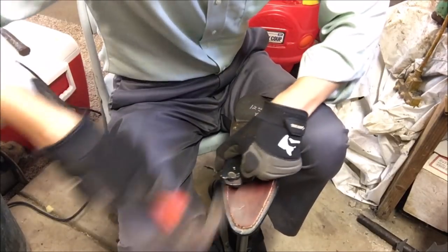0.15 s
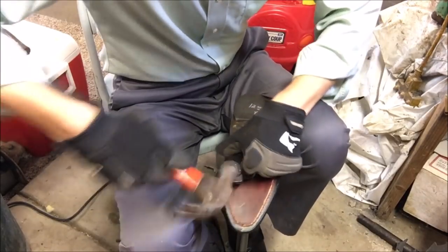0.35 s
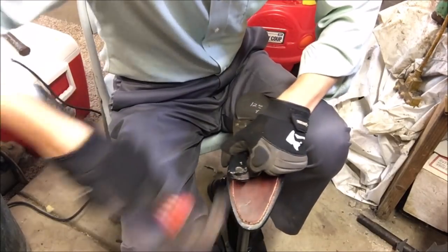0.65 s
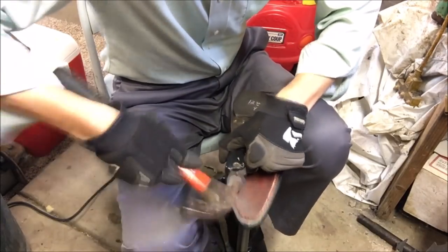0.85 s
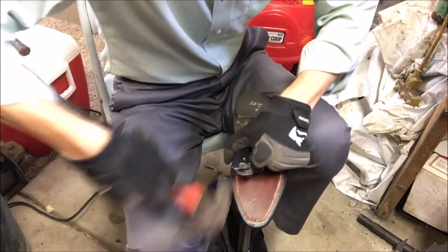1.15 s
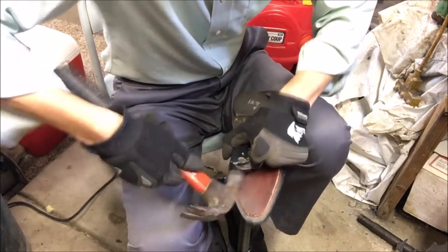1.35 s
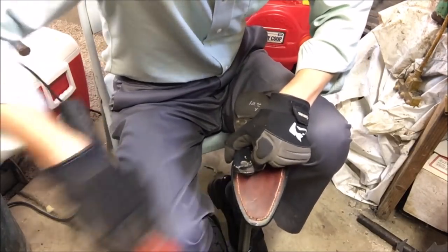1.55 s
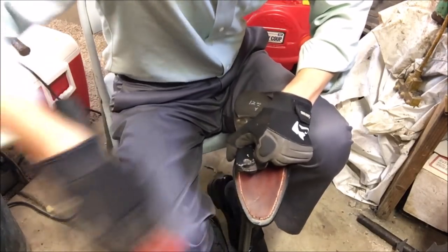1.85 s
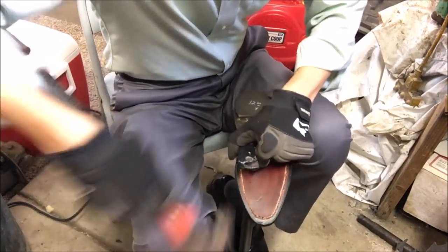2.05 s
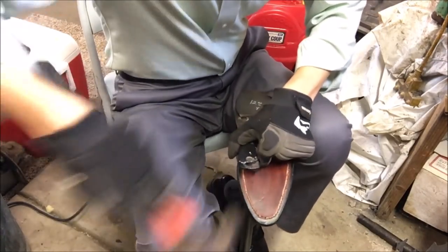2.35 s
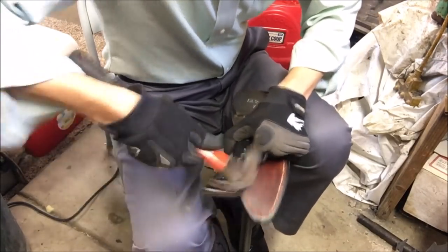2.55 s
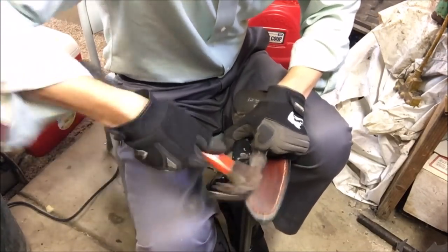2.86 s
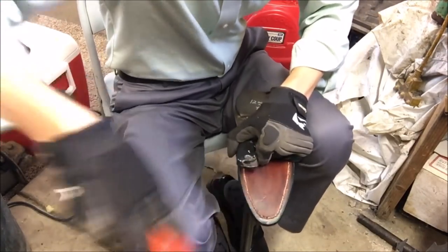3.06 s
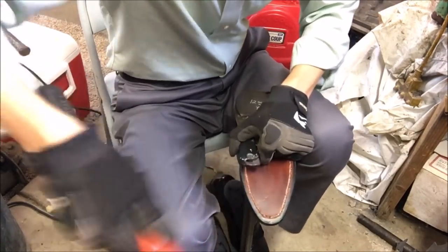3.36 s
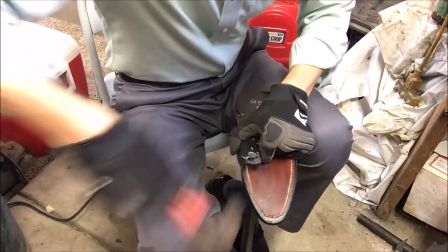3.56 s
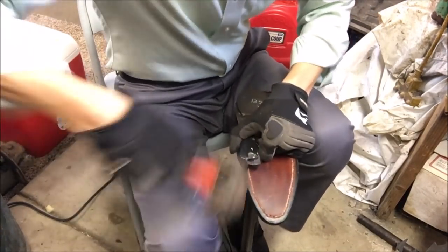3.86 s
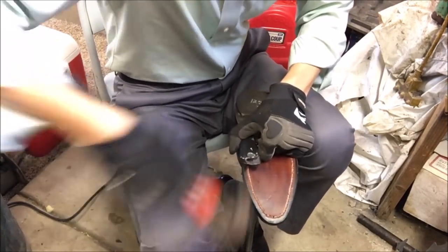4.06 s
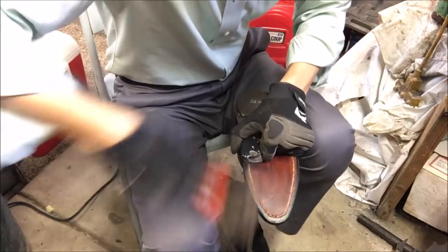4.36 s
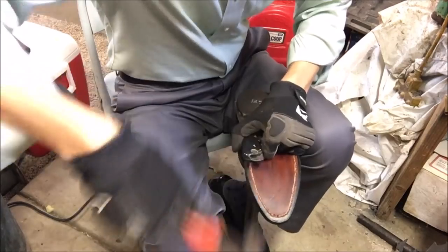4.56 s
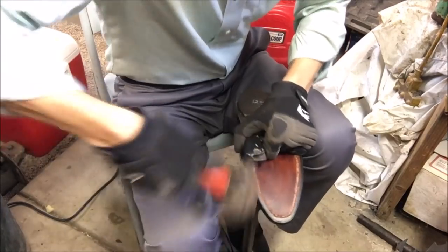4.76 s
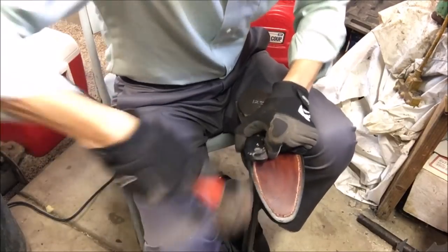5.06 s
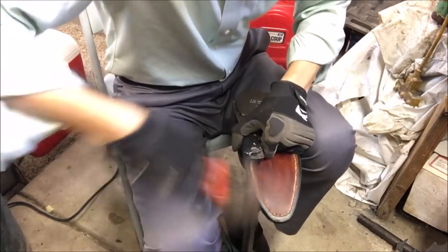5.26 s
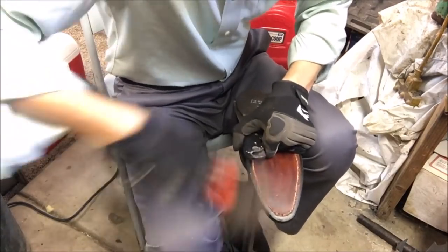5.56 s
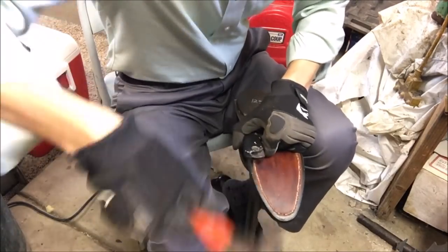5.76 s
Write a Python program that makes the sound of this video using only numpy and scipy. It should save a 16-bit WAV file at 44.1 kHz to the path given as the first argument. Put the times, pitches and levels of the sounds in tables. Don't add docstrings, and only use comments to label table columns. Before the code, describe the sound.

Rapid, regular hammer blows on a metal blade, bright and clacking with a hollow shoe thud beneath, over a faint room hush.

```python
import sys
import numpy as np
from scipy import signal
from scipy.fft import rfft, irfft
from scipy.io import wavfile
from scipy.ndimage import uniform_filter1d

SR = 44100
rng = np.random.default_rng(int(sys.argv[2]) if len(sys.argv) > 2 else 0)


def master_out(mix):
    frames = np.transpose(np.atleast_2d(mix))
    ceiling = np.clip(frames, -1, 1)
    pcm = np.round(ceiling * 32767).astype(np.int16)
    wavfile.write(sys.argv[1], SR, pcm)


def decibels_to_gain(level_db):
    exponent = np.asarray(level_db, float) / 20
    return 10 ** exponent


N = 259943

# (time [s], strength [dB], lower ring [dB], upper ring [dB], clang [Hz])
BLOW_TABLE = [(0.2075, -1.5, -20.5, -29, 3010), (0.4649, -4, -23, -27.5, 2165),
              (0.726, -2.5, -33, -47, 2210), (0.9863, -0.5, -25, -24, 3260), (1.235, -6, -47, -27, 2020),
              (1.4901, -6, -18, -42, 2020), (1.7771, -7, -28.5, -25, 1910),
              (2.0715, -4.5, -18.5, -18, 3220), (2.3659, -1, -31, -41, 3200), (2.683, -1, -39, -29.5, 2315),
              (2.982, -1.5, -32, -27, 3590), (3.285, -2, -31, -32, 3100), (3.5954, -2.5, -43, -29, 2660),
              (3.8983, -4, -33, -27, 2100), (4.2368, -6, -13.5, -28, 2010), (4.529, -1.5, -40, -38, 2440),
              (4.832, -2.5, -23, -48, 2850), (5.1182, -7, -27, -27, 2730), (5.4229, -7.5, -17.5, -22, 2080),
              (5.7284, -2, -33, -36, 2520)]
# (frequency [Hz], density [dB per Hz])
CONTACT_SPECTRUM = [(290, -5), (500, -7), (880, -11), (2890, -0.5), (3650, -6), (5710, -2.5), (6140, -4.5),
                    (7000, -7), (13800, -16), (16000, -18)]


def unit(x):
    return x / np.abs(x).max()


def fade(t, t60):
    return (t >= 0) * np.exp(-np.log(1000) * np.maximum(t, 0) / t60)


def mode(t, hz, t60, rise=1e-4):
    return np.sin(2 * np.pi * hz * t) * fade(t, t60) * (1 - np.exp(-np.maximum(t, 0) / rise))


def colour(x, spectrum):
    hz, db = np.transpose(spectrum)[:2]
    n = x.shape[-1]
    f = np.maximum(np.arange(n // 2 + 1) * SR / n, 1)
    return irfft(rfft(x) * decibels_to_gain(np.interp(np.log(f), np.log(hz), db)), n)


def passband(x, order, edge_hz, kind):
    return signal.sosfilt(signal.butter(order, edge_hz, kind, fs=SR, output="sos"), x)


def hush():
    # (frequency [Hz], density [dB per Hz])
    spectrum = [(12, -45), (20, -19), (60, 7), (262, -7.5), (434, -1), (873, -9.5), (2140, -3), (4180, -9),
                (6360, -9), (16000, -45)]
    noise = colour(rng.standard_normal(N + 1), spectrum)[:N]
    return decibels_to_gain(-60.5) * noise / noise.std()


def shed(t):
    # (frequency [Hz], level [dB], t60 [s])
    reverb = [(60, -5, 0.58), (173, -7, 0.7), (400, -2.5, 0.32), (1120, -4.5, 0.43), (2840, -5.5, 0.46),
              (5430, -6.5, 0.43), (7850, -4.5, 0.32), (15000, -2.5, 0.24)]
    hz, db, t60 = np.transpose(reverb)
    n = 3 * len(t)
    centres = 50 * 2 ** np.arange(0, 8.4, 1 / 3)
    edges = centres[:, None] * 2 ** np.array([-1 / 6, 1 / 6])
    bands = np.array([passband(rng.standard_normal(n), 2, pair, "band") for pair in edges])
    flicker = np.repeat(rng.standard_normal((len(edges), n // 350)), 350, axis=1)
    bands *= decibels_to_gain(1.65 * uniform_filter1d(flicker, size=350))
    gain = np.interp(np.log(centres), np.log(hz), db)[:, None]
    decay = np.interp(np.log(centres), np.log(hz), t60)[:, None]
    late = t - 0.006
    slopes = fade(late, 0.8 * decay) + decibels_to_gain(-18.5) * fade(late, 2.62 * decay)
    return bands, decibels_to_gain(gain - 35) * slopes * (1 - fade(late, 0.019))


def diffuse(tail, sound, size):
    blurred = np.sqrt(np.abs(uniform_filter1d(np.abs(rfft(sound)) ** 2, size=size)))
    return irfft(rfft(tail) * blurred, len(tail)) * np.hanning(2 * len(tail))[len(tail):]


def boom(t):
    return mode(t, 157, 0.34, rise=0.02) + 0.4 * mode(t, 149, 0.25, rise=0.02)


def echoes(x):
    # (delay [s], level [dB])
    reflections = [(0.01, -16.5), (0.014, -13.5), (.024, -26.5), (.033, -40.5), (.047, -39)]
    dull = uniform_filter1d(x, size=3)
    return sum(decibels_to_gain(db) * np.pad(dull, (int(s * SR), 0))[:len(x)] for s, db in reflections)


def shoe(t, thud_db, thud_hz, stand_db):
    thud = mode(t, thud_hz, 0.03, rise=0.0016)
    thud += decibels_to_gain(-20.0) * mode(t, 443.6, 0.18, rise=0.0027) + decibels_to_gain(-28.0) * mode(t, 538, 0.038)
    stand = mode(t, 81, 0.048, rise=0.004) + decibels_to_gain(-3.5) * mode(t, 111, 0.044, rise=0.0024)
    return passband(decibels_to_gain(thud_db + 9.0) * thud + decibels_to_gain(stand_db + 10.0) * stand, 2, 50, "high")


def wedged(t, low_hz, high_hz):
    low = mode(t - 0.002, low_hz, 0.024, rise=0.00051)
    return decibels_to_gain(-19.5) * low + decibels_to_gain(-18) * mode(t, high_hz, 0.02)


def crack(t, bright_db, lag_ms, rebound_db, strength_db):
    # (level at strength 0 [dB], slope [dB per dB of strength])
    body = (-19, -1.35)
    body_db = body[0] + body[1] * strength_db
    grit = colour(rng.standard_normal((3, len(t))), CONTACT_SPECTRUM)
    held = np.minimum(1, 8 * fade(t, 0.0065))
    snap_shape = [(900, body_db + 18.5), (2500, 0.01), (7000, 0.0093), (10000, bright_db + 17.5)]
    snap = colour(grit[0], snap_shape) * held
    rebound_shape = [(900, body_db + 14.0), (2500, 0.005), (7000, 0), (10000, bright_db + 10.5)]
    rebound = colour(grit[1], rebound_shape) * fade(t - lag_ms / 1000, 0.037)
    chatter = unit(uniform_filter1d(grit[2], size=3)) * fade(t, 0.076)
    rough = unit(snap) + decibels_to_gain(rebound_db) * unit(rebound) + decibels_to_gain(-7) * chatter
    return passband(rough, 2, 220, "high")


def steel(t, low_db, high_db, clang_hz):
    head_hz = (6168, 6182, 6532, 6560, 5140, 7860)
    # (level [dB], t60 [s])
    head = [(-1.5, 0.056), (-22, 0.29), (0.5, 0.017), (-1.5, 0.088), (-20, 0.056), (-16.5, 0.18)]
    # (frequency [Hz], level [dB], t60 [s])
    blade_modes = [(839, -6.5, 0.13), (1164, -2, 0.06), (1354, 6, 0.033), (1900, 9, 0.018),
                   (2100, 1, 0.043), (2440, -26, 0.032), (2530, -8, 0.091), (3220, 4, 0.02),
                   (3690, 2.5, 0.023), (4670, -12, 0.01)]
    struck = (low_db, low_db, high_db, high_db, low_db, high_db)
    ring = sum(decibels_to_gain(db + extra) * mode(t, hz, t60, rise=0.00021)
               for hz, (db, t60), extra in zip(head_hz, head, struck))
    scatter = rng.standard_normal((len(blade_modes), 2)) * [4, 0.012]
    blade = sum(decibels_to_gain(db + extra) * mode(t, hz * (1 + detune), 0.55 * t60)
                for (hz, db, t60), (extra, detune) in zip(blade_modes, scatter))
    blade = signal.fftconvolve(blade, rng.standard_normal(len(t)) * fade(t, 0.014))[:len(t)]
    clang = mode(t, clang_hz, 0.033, rise=0.00025)
    blade_uneven, clang_uneven = 2.5 * rng.standard_normal(2)
    notes = decibels_to_gain(1.5) * ring + decibels_to_gain(-16.5 + blade_uneven) * unit(blade)
    return notes + decibels_to_gain(-19.5 + 0.38 * clang_uneven) * clang


def scene():
    # (lag [ms], rebound [dB], thud [dB], thud [Hz], stand [dB])
    thuds = [(5, -8, -24, 473, -51), (3.75, -2, -23.5, 400, -44), (2.4, -1, -34.5, 370, -31),
             (3.5, -8, -25, 388, -52), (2.6, 3, -21, 420, -59), (2.67, 2, -21, 414, -43),
             (5.23, 2, -24.5, 440, -46), (6.2, -1, -24.5, 464, -35.5), (5.18, 0, -20, 380, -49),
             (4.56, -5.5, -16, 438, -56), (4.48, -5, -19.5, 420, -55), (3.2, -3.5, -24, 463, -31),
             (4.84, -2, -23.5, 464, -49), (5.71, 4.5, -13.5, 406, -35), (4.64, -2.5, -14.5, 387, -54),
             (4.6, -2.5, -17.5, 450, -43), (2, -2, -24.5, 457, -38.5), (2.7, 2.5, -13, 405, -43),
             (4.43, 1, -19.5, 444, -39), (5, -0.5, -16.5, 381, -63)]
    # (low clang [Hz], high clang [Hz], clangs [dB], brightness [dB], boom [dB])
    wedge = [(1130, 4620, 2.5, -13, -43.5), (1140, 9300, 1.5, -10.5, -45), (1140, 5200, -1.5, -12, -56),
             (1133, 6500, 2, -15.5, -40), (1100, 3800, -4, -14.5, -36.5), (1740, 4720, -1, -12.5, -37.5),
             (1944, 5130, 4.5, -12.5, -38), (1130, 5600, -2.5, -15, -40.5), (1295, 4490, 1, -17.5, -40),
             (1123, 5790, 1, -16.5, -38.5), (1340, 5800, 2, -13.5, -57), (1316, 3800, -1, -14, -39),
             (1100, 4070, 0.5, -15.5, -44.5), (1282, 3400, 7, -14, -66), (1550, 4190, 3, -8, -43.5),
             (1890, 5670, -7, -14, -42), (1730, 5600, -3, -12, -34.5), (1130, 5160, 3, -10, -45),
             (1360, 4090, 3.5, -7.5, -36.5), (1810, 4170, 1, -15, -34)]
    # (time [s], level against first blow [dB], lower ring extra [dB])
    earlier = (-.065, -1.5, 11)
    t = np.arange(SR // 2) / SR
    lead = SR // 4
    out = np.zeros(N + lead + len(t))
    bands, decays = shed(t)
    _, db, low_db, *rest = BLOW_TABLE[0]
    blows = [(earlier[0], db, low_db + earlier[2], *rest)] + BLOW_TABLE
    for blow, answer, seat in zip(blows, thuds[:1] + thuds, wedge[:1] + wedge):
        s, db, low_db, high_db, clang_hz = blow
        lag_ms, rebound_db, thud_db, thud_hz, stand_db = answer
        low_hz, high_hz, clangs_db, bright_db, boom_db = seat
        contact = decibels_to_gain(db - 4.0) * crack(t, bright_db, lag_ms, rebound_db, db)
        notes = steel(t, low_db, high_db, clang_hz) + decibels_to_gain(clangs_db) * wedged(t, low_hz, high_hz)
        hollow = shoe(t - lag_ms / 1000, thud_db, thud_hz, stand_db)
        skip = rng.integers(2 * len(t))
        tail = (bands[:, skip:skip + len(t)] * decays).sum(axis=0)
        echo = diffuse(tail, contact, size=380)
        echo += decibels_to_gain(-5.5) * (diffuse(tail, notes, size=130) + diffuse(tail, hollow, size=16))
        direct = contact + notes
        heard = direct + echoes(direct) + hollow + echo + decibels_to_gain(boom_db + 1.0) * boom(t)
        at = int(s * SR) + lead
        out[at:at + len(t)] += heard * decibels_to_gain(earlier[1] if s < 0 else 0)
    return (out[lead:lead + N] + hush())[None]


def lead_in(extra_db):
    early_span = 1024
    before = np.arange(early_span + 64, 0, -1) / SR
    noise = colour(rng.standard_normal((3, len(before))), CONTACT_SPECTRUM)
    noise /= noise.std()
    ticks = sum(decibels_to_gain(db) * fade(at * early_span / SR - before, 0.014) for at, db in ((1, 7.5), (1 / 2, 6.0)))
    hiss = decibels_to_gain(-49 + 0.27 * extra_db) * ticks * noise[0] + decibels_to_gain(-31) * fade(before, 0.018) * noise[1]
    narrow = colour(noise[2], [(2300, -40), (2650, 0), (3150, 0), (3500, -40)])
    turn = 2 * np.pi * (before + rng.random())
    whine = narrow / narrow.std() + decibels_to_gain(-17.5) * np.sin(8100 * turn)
    swell = decibels_to_gain(-36.5 + extra_db) * whine + decibels_to_gain(-44.5 + extra_db) * np.sin(430 * turn)
    return hiss + swell * np.clip(1 - before / 0.016, 0, 1)


def thin_out(x, kept_bands):
    window = np.hanning(len(x))
    f = np.arange(len(x) // 2 + 1) * SR / len(x)
    keep = 0.8 * (f < 520) + decibels_to_gain(5) * sum(np.abs(f - hz) < 110 for hz in kept_bands)
    return x * (1 - window) + irfft(rfft(x * window ** 0.5) * keep, len(x))


def roll_off(x):
    return signal.sosfilt(signal.butter(12, 16960, fs=SR, output="sos"), x)


def record(dry):
    lead_in_levels = [-2, -6, -3, 2, -7, -20, -13, 1, 4.5, -3, 6, 2, -0.5, 6, -18, -2.5, -2, -2, -3, 2]
    # (time [s], bands that stay [Hz] ..)
    thinned = [(.105, 1500, 3100, 5200, 6200), (.873, 900, 1700, 3000), (1.556, 1800, 2500, 6200, 6600),
               (1.918, 1100, 2200, 2800, 4300), (2.215, 1200, 2400, 3200, 6500),
               (3.005, 2100, 3100, 3650, 9100), (3.135, 2100, 3300, 5200, 6200), (3.475, 2100, 2600, 6400),
               (3.988, 1400, 2500, 3200, 6600), (5.183, 1500, 4500, 5100, 6500)]
    x = passband(dry[0], 1, 22, "high")
    x = np.tanh(1.223 * x) / 1.238
    for (s, *_), extra_db in zip(BLOW_TABLE, lead_in_levels):
        ahead = lead_in(extra_db)
        at = int(s * SR)
        x[at - len(ahead):at] += ahead
    moments = [(row, 27) for row in thinned]
    moments.append(([1.484], 13.6))
    for (s, *kept_bands), ms in moments:
        a, b = int((s - ms / 2000) * SR), int((s + ms / 2000) * SR)
        x[a:b] = thin_out(x[a:b], kept_bands)
    x = signal.sosfilt(signal.ellip(8, 0.2, 50, 15800, fs=SR, output="sos"), x)
    return roll_off(x[None])


dry = scene()
out = record(dry)
master_out(out)
```